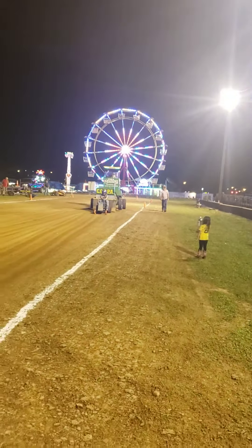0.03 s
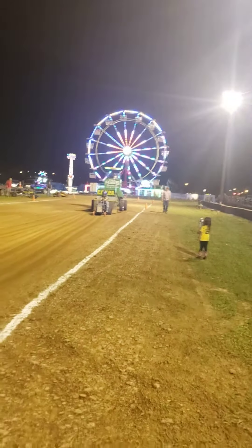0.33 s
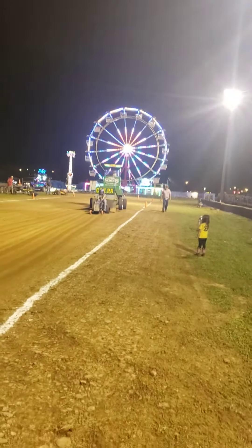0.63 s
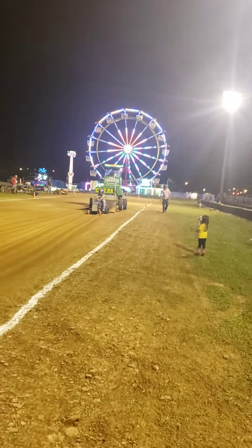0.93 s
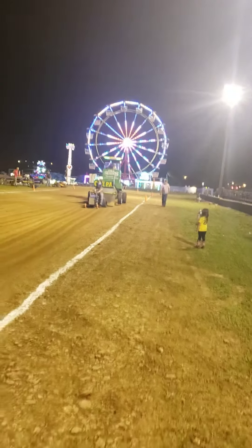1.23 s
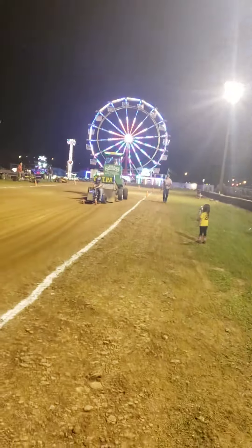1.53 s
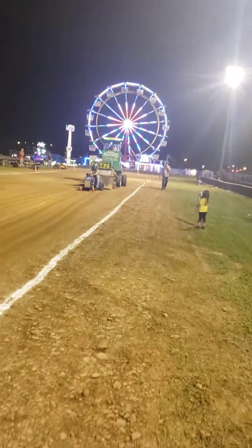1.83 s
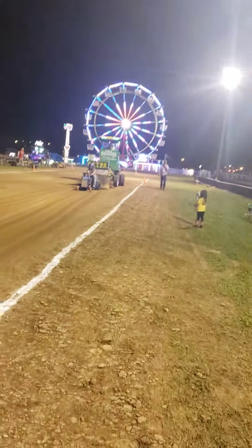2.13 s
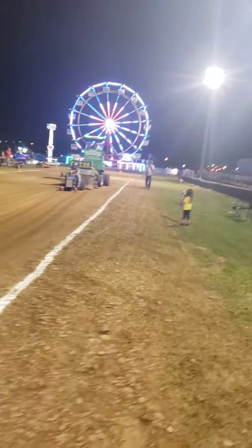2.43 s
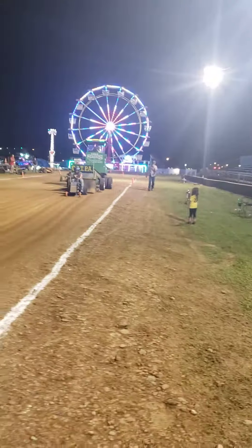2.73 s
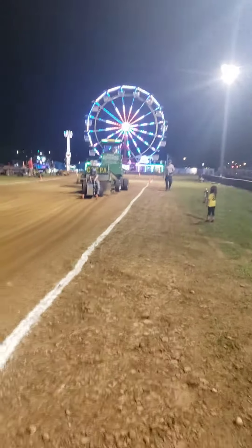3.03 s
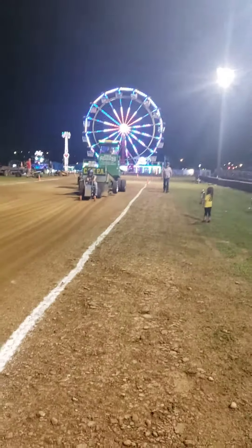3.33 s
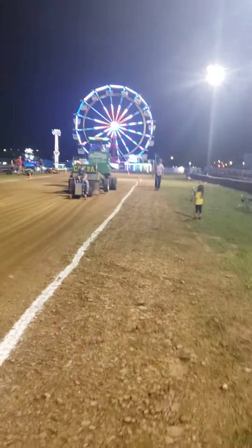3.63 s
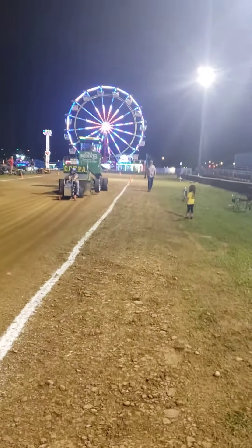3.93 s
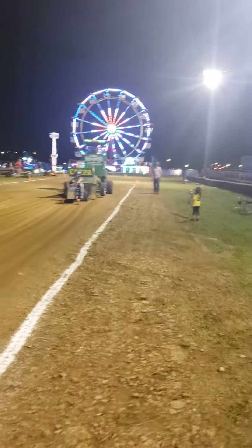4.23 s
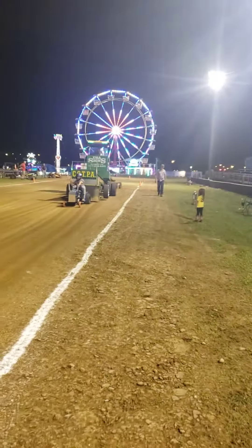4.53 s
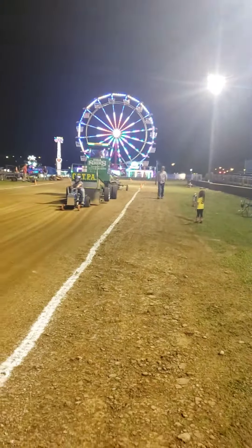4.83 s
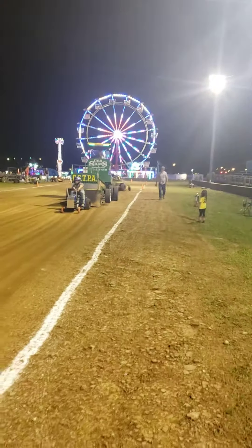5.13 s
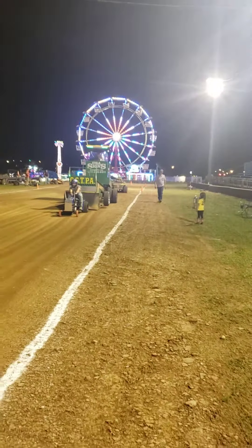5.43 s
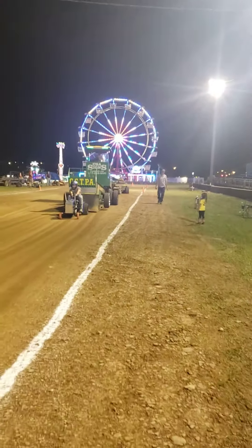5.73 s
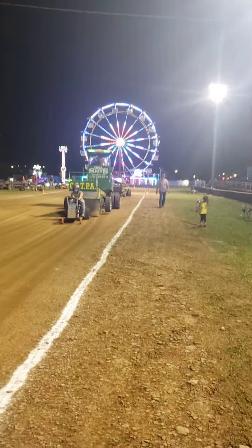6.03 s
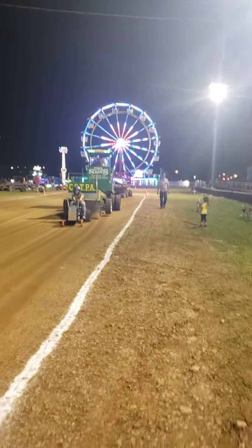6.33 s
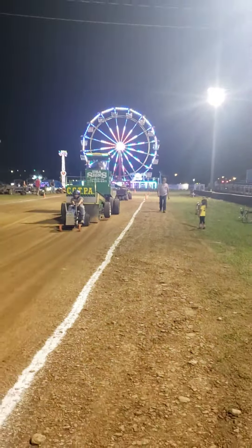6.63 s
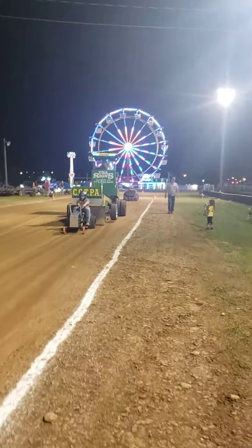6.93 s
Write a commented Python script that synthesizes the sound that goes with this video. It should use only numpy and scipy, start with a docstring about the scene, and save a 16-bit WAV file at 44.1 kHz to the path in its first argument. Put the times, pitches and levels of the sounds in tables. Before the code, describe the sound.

A loud tractor engine is already at full throttle at the start, heard from behind as it drags a heavy sled along an outdoor dirt track. Rapid, uneven exhaust pulses merge into a deep boom with a harsh bark and crackle on top. Churned dirt rumbles underneath, and the grounds add a thin echo. The pitch stays nearly steady, sagging and recovering slightly under load. From about 1 to 1.7 seconds a faint low drone swells and fades. Two strong humming tones in the engine take turns: the lower leads at first, the higher from about 2 to 4 seconds, the lower again until 5, then mostly the higher. The exhaust grows a little fuller and raspier as the tractor draws away. The low drone returns around 6.5 seconds, and the engine is still roaring at the end, just after 7 seconds.

```python
"""A pulling tractor, heard from behind, drags its sled down a dirt track at full throttle, near 2500 rpm.
From the start, two unevenly spaced firings a turn excite its open stacks: a harmonic boom, with a shock
front and turbulent crackle on each pulse, over rumbling dirt and a thin echo from the grounds.
About a second in, a low drone swells and fades. As the tractor draws away, two loud harmonics swell
in turn and the bark grows fuller and raspier. The drone returns near the end."""
import sys
import numpy as np
from scipy import signal
from scipy.fft import rfft, irfft, next_fast_len
from scipy.io import wavfile
from scipy.ndimage import map_coordinates

SR = 44100
rng = np.random.default_rng(int(sys.argv[2]) if len(sys.argv) > 2 else 0)


def transcribe(u):
    """Save the signal u as a 16-bit wav file named by the first command-line argument.

    u: samples, shape (n,) or (channels, n), limited to [-1, 1]; the rate is SR.
    q: integer samples, one column per channel.
    """
    v = np.clip(np.atleast_2d(u).T, -1, 1)
    q = np.round(v * 32767).astype(np.int16)
    wavfile.write(sys.argv[1], SR, q)


N = 316197

# spectrum of churned dirt: frequency_hz, relative_db
DIRT_SPECTRUM = [(20, -24), (45, -2), (90, 7), (150, -1), (240, 4), (330, -6.5), (600, -3), (900, -20),
                 (2500, -29)]
# swells of the drone: start_s, length_s, level_db
DRONE_SWELLS = [(.88, 0.84, -35), (6.45, .8, -37.5)]
# reverberation time of the grounds: frequency_hz, t60_s
ECHO_DECAY = [(200, 0.13), (2000, 0.15), (6000, 0.6), (15000, 0.014)]
# the crank sags and recovers under load: time_s, speed_hz
CRANK_SPEED = [(0.0, 41.767), (0.37, 41.875), (0.74, 42.297), (1.02, 41.244), (1.6, 41.179), (1.95, 42.478),
               (2.44, 42.172), (2.8, 42.504), (2.96, 42.234), (3.31, 42.552), (3.85, 42.044),
               (4.33, 42.557), (4.64, 41.629), (5.22, 42.866), (6.0, 43.241), (6.58, 42.543),
               (7.17, 41.488)]
# two firings and a weak after-puff: angle_turns, strength_db, rise_ms
FIRING_PULSES = [(.214, 0, 1.1), (.856, 0, 1.9), (.43, -13, 1.5)]
# colour of the blasts at each microphone port: frequency_hz, relative_db
LEFT_RESPONSE = [(550, -4), (800, -5), (1080, 5), (1230, 1), (1500, 8), (2200, 4), (3400, 3.5), (4200, -3),
                 (7400, -2.5), (8600, -10), (9900, -10), (11000, -5), (14500, .5)]
RIGHT_RESPONSE = [(550, -6), (800, -9), (1100, -2), (1500, -6), (2400, 0), (3500, -2), (4200, -7),
                  (5400, -5), (6500, -9), (7400, -18), (8800, -3.5), (10900, -4), (12000, 2), (14200, -10)]
# treble balance, before scaling: time_s, left_minus_right_db
TREBLE_BALANCE = [(0.0, -1), (0.12, -4), (2.68, 2.5), (2.79, -1), (3.17, 0.0), (3.47, -1.5), (3.85, -0.5),
                  (4.33, 5), (4.41, 3), (4.73, -7), (4.91, -0.5), (5.23, 0.5), (5.37, -4.5), (7.17, 0.5)]
# the blasts surge under load; contour before scaling: time_s, relative_db
LOAD_SURGE = [(0.0, -25.5), (0.3, -24.5), (0.42, -26), (2.16, -24.5), (2.29, -23.5), (3.17, -26.5),
              (4.75, -24), (5.55, -25.5), (7.15, -24.5), (7.17, -26)]
# harmonics (orders) of the crank speed at mid-pull, before swells: order, level_db
HARMONICS = [(1, -47), (2, -27.5), (3, -25.6), (4, -36), (7, -40.5), (8, -39.5), (9, -33.5), (10, -33.5),
             (11, -30.5), (12, -43), (13, -38.5), (14, -34), (15, -47.5), (16, -39.5), (17, -44),
             (18, -54.5), (19, -54.5), (21, -63), (22, -46), (23, -58), (24, -48)]
# change in the harmonics as the tractor draws away: lowest_order, slope_db_per_s, fading_db
HARMONIC_TRENDS = [(1, 0, .5), (4, .5, 1.5), (7, -0.5, 1.7), (14, -0.6, 1.2), (18, 1.3, 1.8)]
# the two loudest harmonics, before their trim: time_s, fifth_db, sixth_db
HUM_LEVELS = [(0.0, -25.5, -29), (0.26, -22.5, -27), (0.82, -20, -31), (0.96, -20.5, -29.5),
              (1.8, -28.5, -21), (1.88, -23.5, -21.5), (3.01, -31, -19.5), (3.11, -40, -19.5),
              (3.28, -29, -18), (3.95, -22.5, -19.5), (4.29, -20, -29), (4.67, -22.5, -28.5),
              (4.87, -20.5, -28), (4.97, -20.5, -25.5), (5.63, -29, -18.5), (6.45, -22.5, -21),
              (6.99, -30.5, -18), (7.17, -30, -19.5)]
# swells of orders 1 to 3, of order 7 and of orders 8 to 13: time_s, relative_db
BASS_SWELL = [(0.0, -21), (0.5, -23), (1.62, -22), (2.79, -24), (4.07, -21.5), (4.15, -23.5), (6.39, -19.5),
              (7.15, -23), (7.17, -23)]
SEVENTH_SWELL = [(0.0, -40), (0.36, -36), (0.72, -50), (1.22, -33), (1.62, -55), (2.23, -29), (4.19, -53),
                 (4.31, -33), (5.39, -39), (5.63, -28), (5.87, -39.5), (7.17, -34)]
MIDDLE_SWELL = [(0.0, -30), (0.26, -29), (1.56, -27), (3.07, -29), (3.31, -26.5), (4.91, -27.5),
                (5.27, -26.5), (5.43, -27), (7.05, -28.5), (7.17, -31.5)]
# harmonics that pass through the stack's high resonance: order
RINGING_ORDERS = [25, 26]
# tilt of the boom, added at the left port and taken from the right: frequency_hz, tilt_db
BOOM_TILT = [(90, 0.2), (130, 0.55), (260, 0.6), (400, 3.5), (700, 0), (1100, 6)]


def amp(db):
    """Amplitude ratio of a level in decibels."""
    return 10 ** (np.asarray(db) / 20)


def unit(x):
    """Normalisation to rms 1."""
    return x / np.sqrt(np.mean(x ** 2) + 1e-20)


def along(points, hz):
    """Interpolation on a logarithmic frequency axis."""
    knots_hz, values = np.transpose(points)
    return np.interp(np.log(hz + 1), np.log(knots_hz + 1), values)


def curves(rows):
    """Linear interpolation in time: one curve for each column after the first."""
    time_s, *columns = np.transpose(rows)
    return [np.interp(np.arange(N) / SR, time_s, column) for column in columns]


def swing(rows):
    """Deviation of a level curve from its mean."""
    db, = curves(rows)
    return db - db.mean()


def trend(midway, per_s):
    """Linear drift about the value at mid-pull."""
    return midway + per_s * (np.arange(N) - N / 2) / SR


def wobble(rate_hz):
    """Smooth random modulation: a spline through Gaussian knots."""
    knots = rng.standard_normal(int(N * rate_hz / SR) + 4)
    coarse = np.arange(0, N + 32, 32)
    return np.interp(np.arange(N), coarse, map_coordinates(knots, [coarse * rate_hz / SR]))


def filtered(x, response):
    """Linear filtering: the spectrum times a frequency response."""
    size = next_fast_len(N + SR // 2)
    return irfft(rfft(x, size) * response(np.fft.rfftfreq(size, 1 / SR)), size)[..., :N]


def delayed(x, ms):
    """A fixed or moving time delay."""
    return np.interp(np.arange(N) - ms * SR / 1000, np.arange(N), x)


def dirt_rumble(level_db=-33.0):
    """Friction noise: tyres and sled churn the dirt, partly coherent between the ports."""
    noise = rng.standard_normal(N) + 0.75 * rng.standard_normal((2, N))
    return amp(level_db) * unit(filtered(noise, lambda hz: amp(along(DIRT_SPECTRUM, hz))))


def drone(pitch_hz=65.2, fade_s=0.22):
    """Phase modulation makes a low tone waver; it swells up twice."""
    t = np.arange(N) / SR
    tone = unit(np.sin(2 * np.pi * pitch_hz * t + 0.57 * wobble(3.8)))
    return tone * sum(amp(db) * np.clip(np.minimum(t - start, start + length - t) / fade_s, 0, 1)
                      for start, length, db in DRONE_SWELLS)


def grounds_echo(x, level_db=-12.5):
    """Scattering from fences and stands leaves a diffuse tail, each frequency decaying exponentially."""
    hz, t, spectra = signal.stft(rng.standard_normal((2, SR // 2)), SR, nperseg=256)
    decay = amp(-60 * t / along(ECHO_DECAY, hz)[:, None])
    tail = signal.istft(spectra * decay, SR, nperseg=256)[1]
    return amp(level_db) * signal.fftconvolve(x, tail / np.linalg.norm(tail[0]), axes=1)[:, :N]


def firings(crank, scatter_db=0.7, jitter_ms=0.15):
    """Cycle-to-cycle variation: an impulse train per puff, irregular in time and strength."""
    trains = np.zeros((len(FIRING_PULSES), N))
    for train, (angle, db, _) in zip(trains, FIRING_PULSES):
        turns = np.arange(int(crank[-1] - angle) + 1) + angle
        due = np.interp(turns, crank, np.arange(N))
        slip, size = rng.standard_normal((len(due), 2)).T
        onsets = np.clip(due + slip * jitter_ms * SR / 1000, 0, N - 1).astype(int)
        train[onsets] += amp(db + scatter_db * size)
    return trains


def gas_flow(trains, peak_ms, fall_ms, floor):
    """Pulsating flow: a Gaussian rise at each firing, then exponential decay to a steady floor."""
    ms = np.arange(-SR // 50, SR // 50) * 1000 / SR - peak_ms
    shapes = [np.exp(-np.where(ms < 0, (ms / rise) ** 2, ms / fall_ms)) for _, _, rise in FIRING_PULSES]
    return np.hypot(signal.fftconvolve(trains, shapes, "same", axes=1).sum(0), floor)


def turbulence(spiky_db):
    """Intermittency: the noise clumps into tiny shocks."""
    return unit(rng.standard_normal(N) * amp(spiky_db * wobble(2500)))


def port_band(pair, low_hz, high_hz):
    """Band-pass filtering, coloured by each port's response; the mean of the two has rms 1."""
    def response(hz):
        band = 1 / ((1 + (low_hz / (hz + 1)) ** 8) * (1 + (hz / high_hz) ** 8))
        return band * amp([along(LEFT_RESPONSE, hz), along(RIGHT_RESPONSE, hz)])
    heard = filtered(pair, response)
    return heard / np.sqrt(np.mean(heard.mean(0) ** 2))


def crackle(trains):
    """Flow-modulated turbulence spits in the treble and lingers longer at the right port."""
    sway_db = np.array([[0.22], [-0.5]]) * swing(TREBLE_BALANCE)
    level_db = trend(-24.5, per_s=0.02) + 0.5 * wobble(45) + sway_db
    flow = gas_flow(trains, peak_ms=1.3, fall_ms=2.1, floor=0.13)
    left = flow * turbulence(spiky_db=3.0)
    lingering = np.hypot(0.35 * delayed(flow, ms=0.14), amp(2) * delayed(flow, ms=1.7))
    right = lingering * turbulence(spiky_db=5.5)
    return amp(level_db) * port_band(np.array([unit(left), unit(right)]), low_hz=4400, high_hz=SR)


def bark(trains, shock_db=-11, incoherence=0.81):
    """Jet noise: each firing throws a shock front and a rough puff, in three fluttering bands."""
    flow = gas_flow(trains, peak_ms=1.4, fall_ms=2.0, floor=0.34)
    shock = amp(shock_db) * unit(delayed(trains.sum(0), ms=1.079))
    left = unit(flow * turbulence(spiky_db=4.0)) - shock
    right = delayed(left, ms=0.073) + incoherence * unit(flow * turbulence(spiky_db=7.0))
    jet = np.array([unit(left), unit(right)])
    throat = amp(trend(-37.5, per_s=1.36) + 0.76 * wobble(14)) * port_band(jet, low_hz=690, high_hz=1280)
    body = amp(trend(-31, per_s=-0.5) + 0.69 * wobble(22)) * port_band(jet, low_hz=1313, high_hz=2410)
    rasp = amp(trend(-30.6, per_s=0.44) + 1.1 * wobble(18)) * port_band(jet, low_hz=2255, high_hz=5900)
    return throat + body + rasp


def harmonic_levels(speed_hz, hum_trim_db=0.5, ring_hz=1092, half_width_hz=18.6, ring_db=-37.5):
    """Slow fading and resonance set each order's level in dB; the top two ring as they near ring_hz."""
    levels = [(order, db + hum_trim_db) for order, db in zip((5, 6), curves(HUM_LEVELS))]
    swells = [(1, 3, swing(BASS_SWELL)), (7, 7, swing(SEVENTH_SWELL)), (8, 13, swing(MIDDLE_SWELL))]
    for order, db in HARMONICS:
        _, db_per_s, fading_db = [row for row in HARMONIC_TRENDS if row[0] <= order][-1]
        swell_db = sum(curve for first, last, curve in swells if first <= order <= last)
        levels.append((order, trend(db, db_per_s) + swell_db + fading_db * wobble(2.14)))
    for order in RINGING_ORDERS:
        detuning = (order * speed_hz - ring_hz) / half_width_hz
        levels.append((order, ring_db - 10 * np.log10(1 + detuning ** 2) + 1.4 * wobble(6)))
    return levels


def stack_phase(order, hz, pipe_hz=204, width_hz=42, cutoff_hz=28):
    """Phase of one harmonic after pulse interference, pipe resonance and the microphone's bass cut."""
    # the faster a puff rises, the harder it strikes the pipe
    pulses = sum(np.exp(-2j * np.pi * order * angle) / rise for angle, _, rise in FIRING_PULSES[:2])
    resonance = 1j * hz * width_hz / (pipe_hz ** 2 - hz ** 2 + 1j * hz * width_hz)
    bass_cut = (1j * hz / (cutoff_hz + 1j * hz)) ** 2
    return np.angle(pulses * resonance * bass_cut)


def boom(speed_hz, crank, drift_rad=0.79, shake_turns=0.00047, uneven_db=0.43):
    """Periodic forcing: paired pressure pulses drive the stack at harmonics of the crank speed."""
    turns = crank + shake_turns * wobble(60)
    note = np.zeros(N)
    for order, db in harmonic_levels(speed_hz):
        phase = 2 * np.pi * order * turns + stack_phase(order, order * speed_hz.mean())
        # shifting reflections bend the phase of the shorter waves
        bend = drift_rad * wobble(1.525) if order >= 10 else 0
        note += np.sqrt(2) * amp(db) * np.cos(phase + bend)
    note *= amp(uneven_db * wobble(60))
    # the right port hears it later, less so as the tractor draws away
    right = delayed(note, ms=trend(0.2, per_s=-0.0079))
    sides = lambda hz: amp([along(BOOM_TILT, hz), -along(BOOM_TILT, hz)])
    return filtered(np.array([note, right]), lambda hz: sides(hz) / sides(hz).mean(0))


def scene():
    """Superposition: one crank times bark, crackle and boom, over the echo, dirt and drone."""
    speed_hz, = curves(CRANK_SPEED)
    crank = np.cumsum(speed_hz) / SR  # angle in turns
    trains = firings(crank)
    blasts = amp(0.69 * swing(LOAD_SURGE)) * (bark(trains) + crackle(trains))
    return blasts + grounds_echo(blasts) + boom(speed_hz, crank) + dirt_rumble() + drone()


def record(dry, top_hz=15850):
    """Hard clipping flattens the tallest peaks; band limiting removes everything above top_hz."""
    return filtered(np.clip(dry, -1, 1), lambda hz: hz < top_hz)


dry = scene()
out = record(dry)
transcribe(out)
```